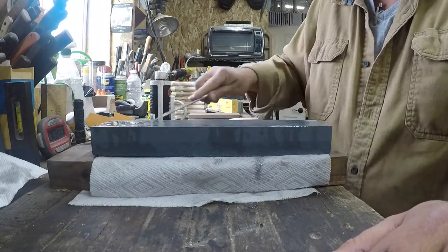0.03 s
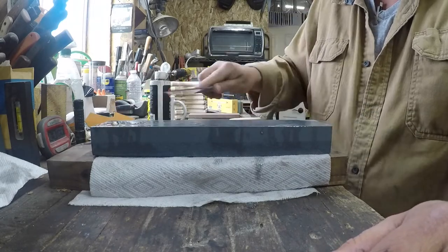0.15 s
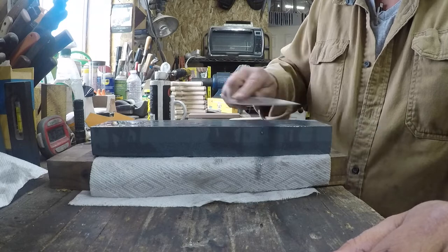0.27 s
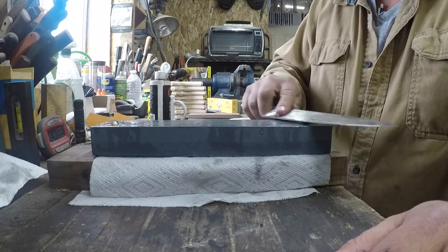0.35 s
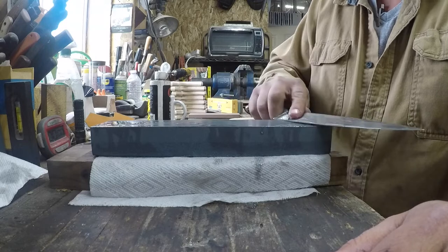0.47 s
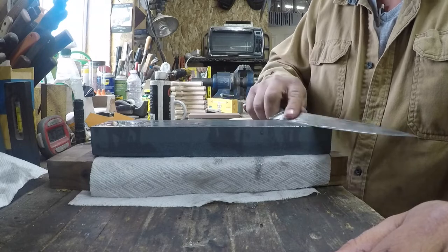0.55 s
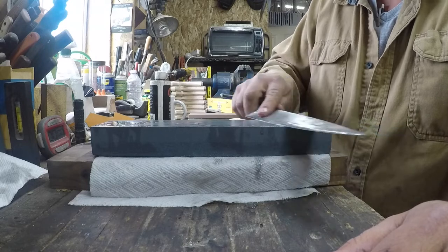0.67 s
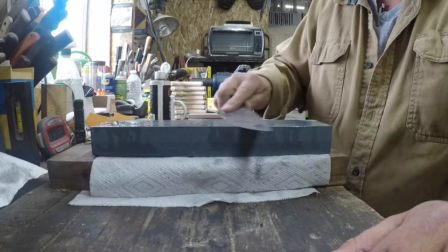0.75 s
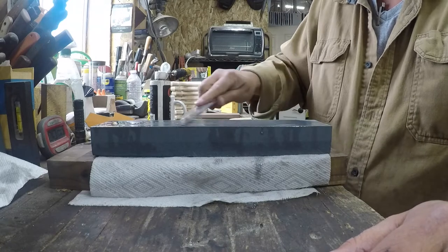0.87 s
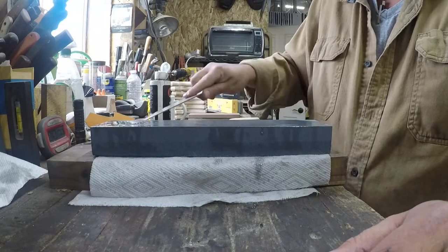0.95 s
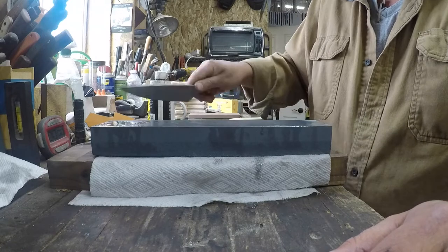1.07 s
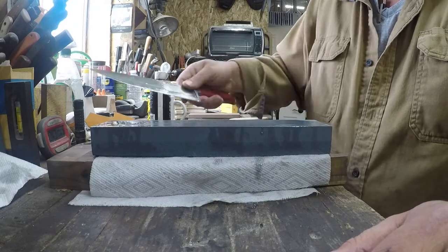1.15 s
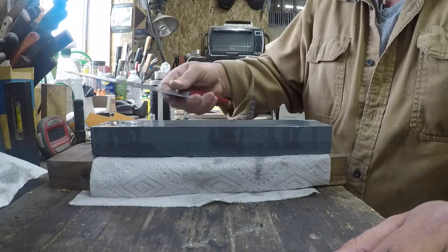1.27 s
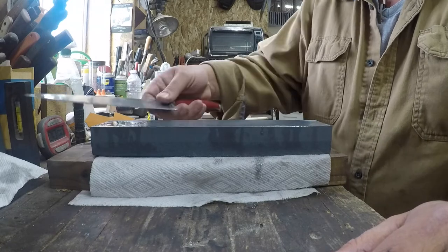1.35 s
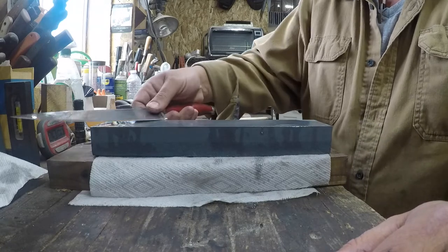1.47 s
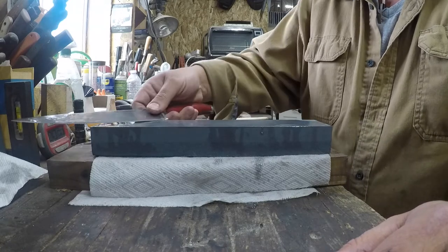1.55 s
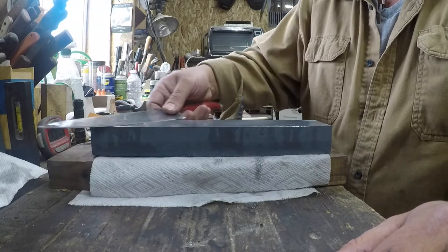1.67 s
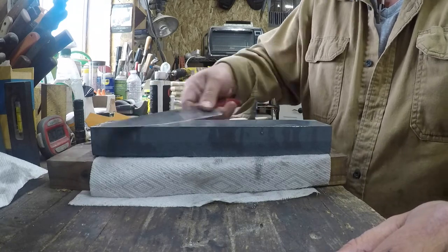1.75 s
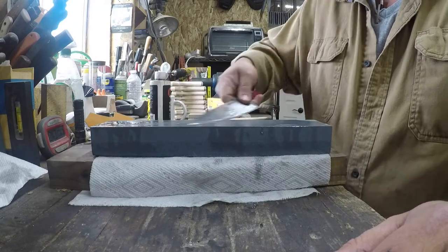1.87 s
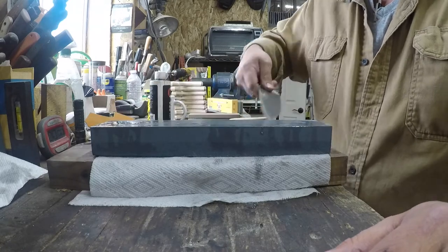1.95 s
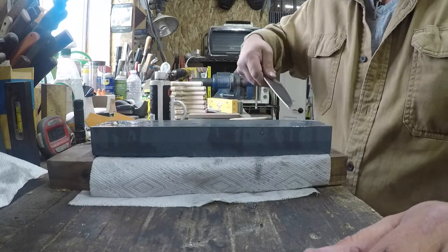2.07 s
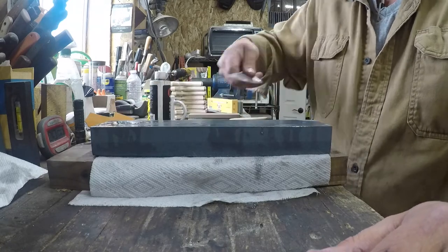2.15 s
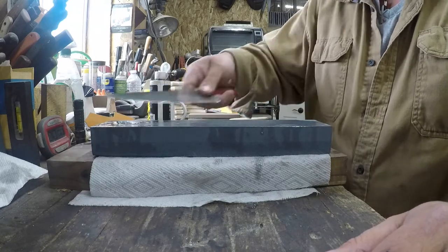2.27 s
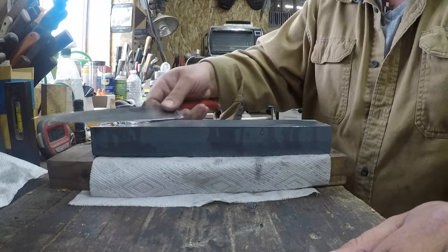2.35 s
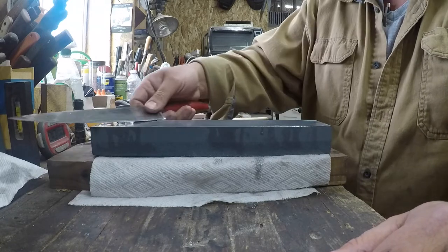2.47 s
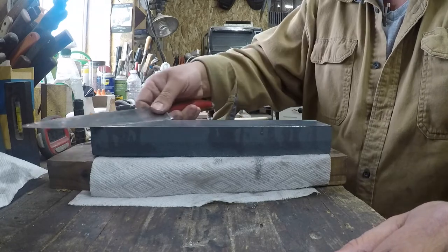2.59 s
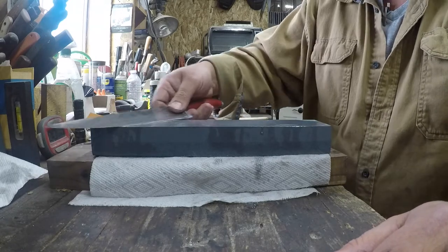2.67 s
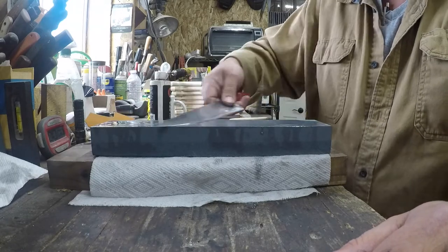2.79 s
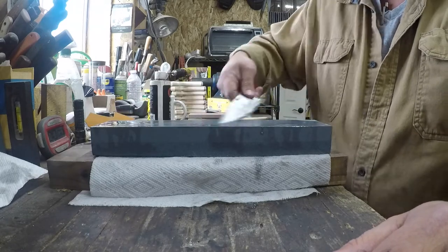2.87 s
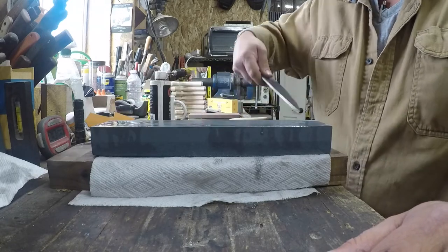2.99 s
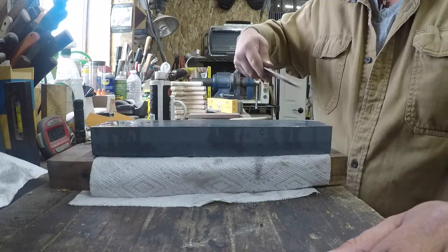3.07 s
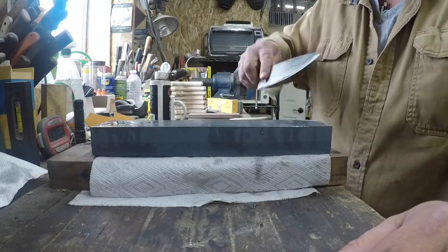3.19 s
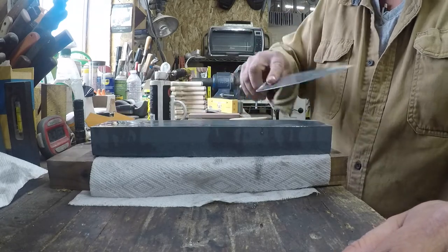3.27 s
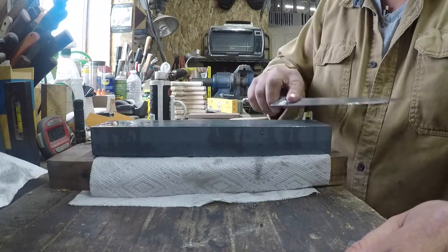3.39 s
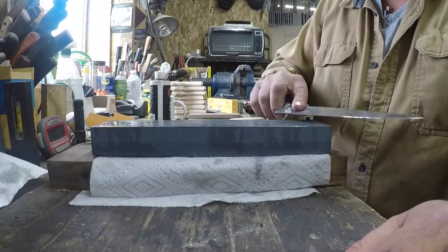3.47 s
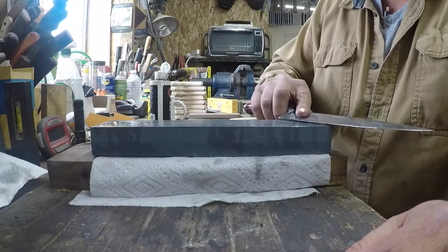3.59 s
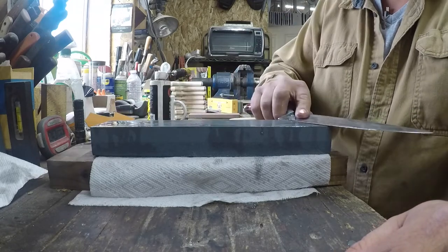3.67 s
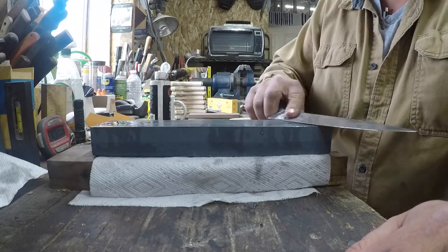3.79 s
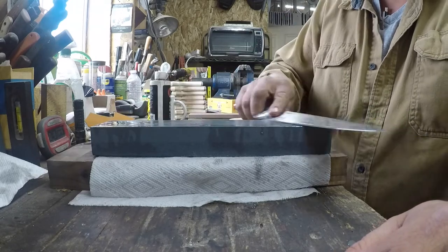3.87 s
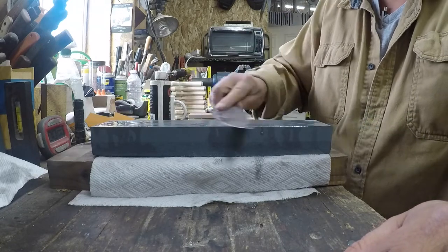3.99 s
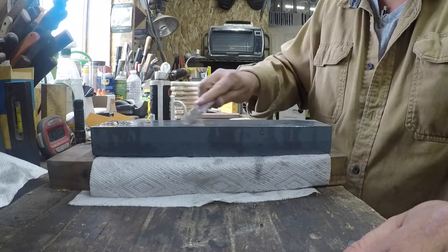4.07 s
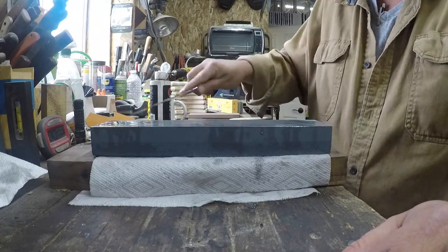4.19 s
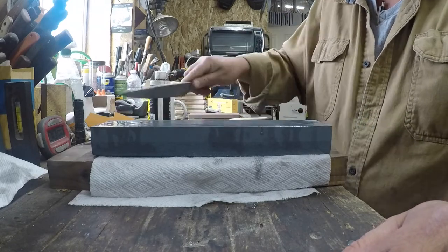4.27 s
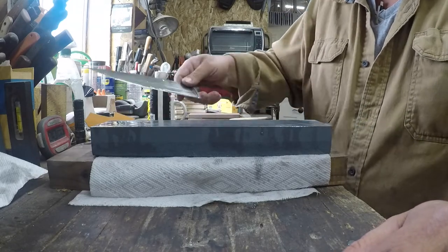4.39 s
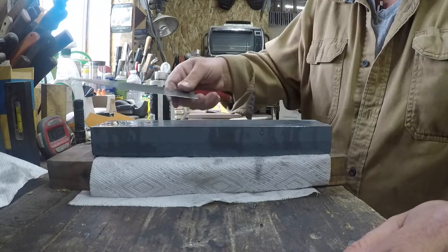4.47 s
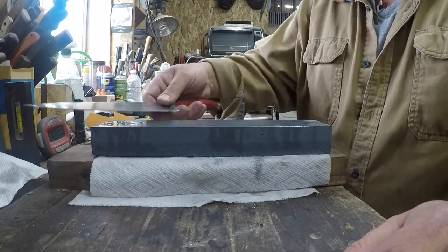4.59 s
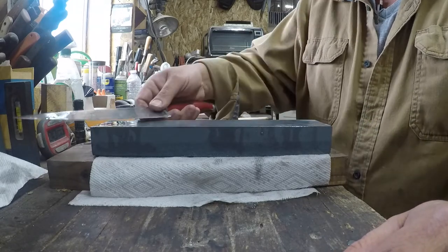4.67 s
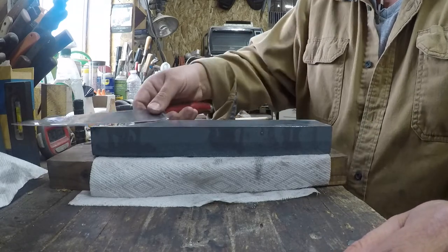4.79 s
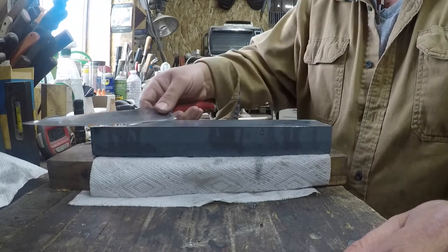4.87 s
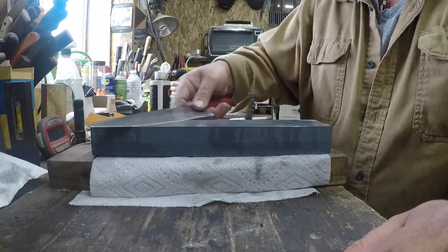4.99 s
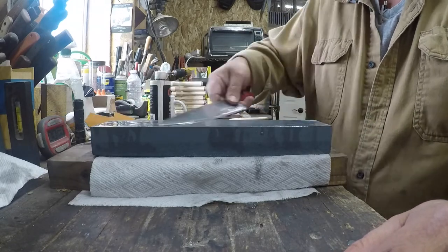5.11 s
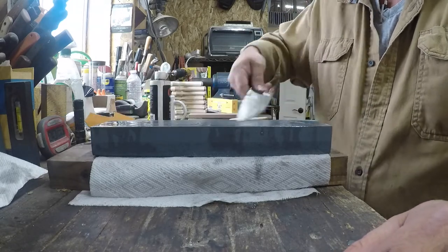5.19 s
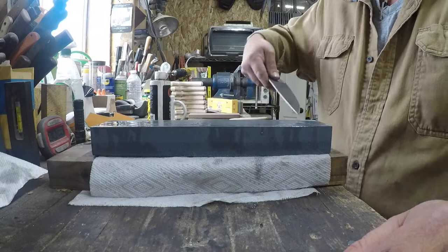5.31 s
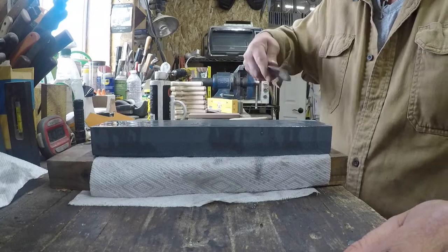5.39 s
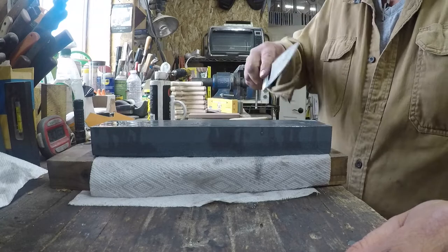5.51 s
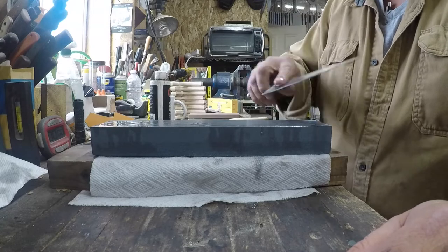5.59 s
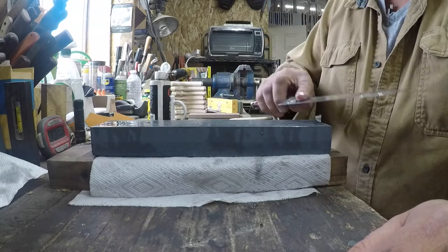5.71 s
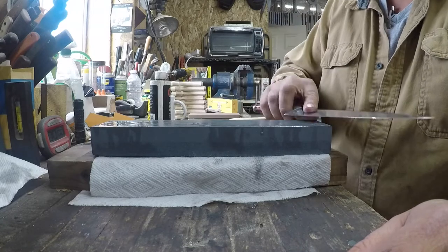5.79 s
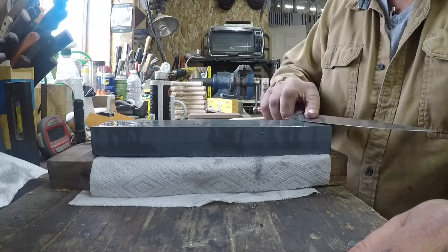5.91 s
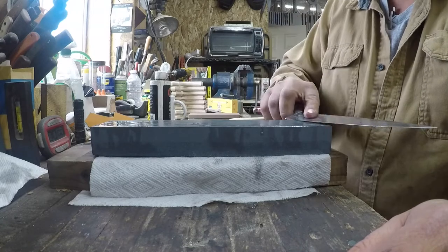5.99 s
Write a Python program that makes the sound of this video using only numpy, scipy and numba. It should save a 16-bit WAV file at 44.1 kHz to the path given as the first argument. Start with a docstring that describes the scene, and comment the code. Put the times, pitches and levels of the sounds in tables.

```python
"""Honing a long knife on a bench stone

To and fro, the blade lands, then its edge is drawn across the grit from heel to tip.
Grit noise drives steel and stone modes that glide as the contact travels; taps ring the blade's own modes.
Shaken modes make the bench thump and judder; sleeve, handle and still air are coloured noise.
The microphones stand on the same bench, in a small workshop."""
import sys
import numpy as np
from scipy import signal
from scipy.fft import rfft, irfft, next_fast_len
from scipy.io import wavfile
from scipy.ndimage import uniform_filter1d, map_coordinates
from numba import njit

SR = 44100
rng = np.random.default_rng(int(sys.argv[2]) if len(sys.argv) > 2 else 0)


def int16_out(signal):
    """Quantize to a 16-bit WAV file."""
    q = np.round(np.clip(np.atleast_2d(signal).T, -1, 1) * 32767)
    wavfile.write(sys.argv[1], SR, q.astype(np.int16))


N = 266805


def amp(db):
    """Decibels to gain."""
    return 10 ** (np.asarray(db) / 20)


def unit(x):
    """Scale to rms 1."""
    return x / np.sqrt(np.mean(x ** 2) + 1e-20)


def unit_pair(x):
    """Scale a stereo pair so that its middle has rms 1."""
    return x / np.sqrt(np.mean(x.mean(axis=0) ** 2) + 1e-20)


def clock():
    """The time of every sample in seconds."""
    return np.arange(N) / SR


def along(points, hz):
    """Interpolate (Hz, value) points on a log frequency axis."""
    point_hz, value = np.transpose(points)
    return np.interp(np.log(hz + 1), np.log(point_hz + 1), value)


def wobble(knots_per_s):
    """A smooth random curve through normally distributed knots."""
    knots = rng.standard_normal(int(N * knots_per_s / SR) + 4)
    return map_coordinates(knots, [np.arange(N) * knots_per_s / SR])


def filtered(x, response):
    """Multiply the spectrum of x by a response of frequency."""
    m = next_fast_len(N + SR // 2)
    return irfft(rfft(x, m) * response(np.fft.rfftfreq(m, 1 / SR)), m)[..., :N]


def coloured(x, spectrum):
    """Filter x by a (Hz, dB) colour and scale to rms 1."""
    return unit(filtered(x, lambda hz: amp(along(spectrum, hz))))


def noise():
    """Two unrelated white noises."""
    return rng.standard_normal((2, N))


def fade(t, t60):
    """A decay that starts at t = 0 and falls 60 dB in t60 seconds."""
    return (t >= 0) * np.exp(-np.log(1000) * np.abs(t) / t60)


def swell(s, half_s):
    """A Gaussian swell centred on s, down to 1/e at half_s either side."""
    return np.exp(-((clock() - s) / half_s) ** 2)


def add(track, s, sound):
    """Mix a short stereo sound in at time s."""
    part = track[:, max(round(s * SR), 0):][:, :sound.shape[1]]
    part += sound[:, :part.shape[1]]


def spread(pair, alike, lean):
    """Blend two unrelated signals into left and right, with a likeness and a level difference per frequency."""
    def mid_side(hz):
        turn = np.arccos(np.clip(along(alike, hz), -1, 1)) / 2
        return np.array([np.cos(turn), np.sin(turn)])

    mid, side = filtered(pair, mid_side)
    sides = np.array([mid + side, mid - side])
    return unit_pair(filtered(sides, lambda hz: amp(np.outer([.5, -.5], along(lean, hz)))))


# Likeness of the two microphones. Each row: frequency in Hz, left-right likeness from -1 to 1.
ALIKE = [(300, -1), (700, -0.15), (1200, 0.2), (2400, 0.9), (5000, 1), (6500, 0.31), (9000, -0.03),
         (14000, 0.66)]
# Balance of the two microphones. Each row: frequency in Hz, left minus right in dB.
LEAN = [(300, -14.5), (700, -4), (1200, 1.5), (4000, -0.5), (7000, -1.5), (9500, -6), (13000, 1.5)]


def at_microphones(pair):
    """Knife and stone sounds as they differ between the two microphones."""
    return spread(pair, ALIKE, LEAN)


def patchy(x, depth_db):
    """The contact shifts from moment to moment, favouring narrow bands at random."""
    z = signal.stft(x, nperseg=1024)[2]
    field = rng.standard_normal(z.shape[1:])
    field = uniform_filter1d(field, size=6, axis=0)
    field = uniform_filter1d(field, size=4, axis=1)
    gain = amp(depth_db * np.clip(unit(field), -2, 2))
    return unit(signal.istft(z * gain, nperseg=1024)[1][:, :N])


@njit
def resonate(x, pole):
    """A resonance whose pitch may change at every sample."""
    out = np.zeros(x.shape)
    for c in range(x.shape[0]):
        state = 0j
        for i in range(x.shape[1]):
            state = state * pole[i] + x[c, i]
            out[c, i] = state.real
    return out


# The edge digs in and drags differently. Each row: centre in seconds, half length in seconds, then the
# change of edge hiss, blade body, stone grind and bench shake, each in dB.
DIGS = [(0.556, 0.028, -1, 4.5, 2, 8), (0.665, 0.08, 4.5, 1.5, 0, -8), (1.63, 0.02, -2.5, 1, -7, 2.5),
        (1.725, 0.066, 2, 3.5, -1.5, 1), (1.96, 0.033, 1, 6, 1.5, -0.5), (2.587, 0.017, 5, 9, 11, 3),
        (2.651, .016, -0.5, 7, 5, 6), (2.704, 0.014, 2, 3, 4, 2), (2.798, 0.038, 3, 4, -3, 2),
        (3.72, 0.026, 4, 9.5, 8.5, -6), (3.892, 0.031, 7, 7.5, -4, 1.5), (3.956, 0.042, 4.5, 8.5, 2, -3),
        (4.012, .018, -1.5, 10.5, 14, 6.5), (4.109, 0.03, 0.5, 9, 2, -5.5),
        (5.083, 0.03, -2.5, -1.5, 4, 5.5)]


def digs():
    """Where the edge digs in, layer levels shift for a moment (dB); judder and rocking share the bench's."""
    swells = np.array([np.exp(-np.minimum(((clock() - s) / half_s) ** 2, 20)) for s, half_s, *_ in DIGS])
    hiss, body, grind, bench = np.transpose(DIGS)[2:] @ swells
    return np.array([hiss, body, grind, bench, bench])


# The edge is drawn from heel to tip. Each row: start in seconds, lift in seconds, bite time constant in
# seconds, then relative levels in dB of edge hiss, blade body, stone grind, bench judder, stone rocking.
STROKES = [(-0.45, 0.019, 0.09, -25.5, -33, -49, -33, -45),
           (0.493, 0.927, 0.034, -25, -34, -45.5, -37, -41.5),
           (1.526, 1.978, 0.074, -26, -33.5, -42, -33.5, -38),
           (2.53, 2.927, 0.039, -27.5, -34, -44, -35, -37.5),
           (3.678, 4.126, 0.074, -25, -38.5, -48.5, -38, -41),
           (4.748, 5.235, 0.094, -27, -34.5, -45.5, -38, -39),
           (5.957, 6.403, 0.23, -28, -41, -48, -39.5, -38.5)]
# How each layer, in that order, follows a stroke. Each row: dB lacking before the edge bites,
# dB lost at the light tip, unevenness in dB.
LAYERS = [(29.9, 4, 0.2), (24.4, 7.5, 1.43), (3, 15, 2.5), (5, 6, 3), (4.9, 12.5, 3)]
DRAW_S = .46  # heel to tip at steady hand speed; a shorter stroke starts further along the edge
TIP_POWER = 3.7  # the drag falls off late in the stroke
UNEVEN_PER_S = 30
TOUCH_T60_S, RELEASE_T60_S = 0.078, 0.1


def hand():
    """Strokes bite, lighten and lift: five layer gains, and the contact's travel from heel (0) to tip (1)."""
    t, gains, travel = clock(), np.zeros((len(LAYERS), N)), np.zeros(N)
    lacking_db, tip_db, uneven_db = np.transpose(LAYERS)[:, :, None]
    for start, lift, bite_s, *levels_db in STROKES:
        near = (t > start - .1) & (t < lift + .3)
        age = t[near] - start
        after = np.maximum(t[near] - lift, 0)
        travel[near] = np.clip(1 - (lift - t[near]) / DRAW_S, 0, 1)
        contact = fade(np.maximum(-age, 0), TOUCH_T60_S) * fade(after, RELEASE_T60_S)
        bite_db = -lacking_db * np.exp(-np.maximum(age, 0) / bite_s)
        lighten_db = -tip_db * travel[near] ** TIP_POWER
        gains[:, near] += contact * amp(np.array(levels_db)[:, None] + bite_db + lighten_db)
    drag_db = uneven_db * np.array([wobble(UNEVEN_PER_S) for _ in LAYERS])
    return gains * amp(drag_db + digs()), travel


def grit(catch, grains_per_s, size_db, bed):
    """Single grains snap under the edge, over a bed of finer ones."""
    sizes = amp(size_db * np.minimum(rng.exponential(size=N), 1.6))
    snaps = (rng.random(N) < grains_per_s / SR) * sizes
    return catch * (unit(snaps * np.sign(noise())) + bed * noise())


def rubbed(force, spectrum, glides, travel):
    """Friction excites modes that slide with the contact, under a broad fixed colour."""
    out = force
    for heel_hz, tip_hz, width_hz, db in glides:
        hz = heel_hz * (tip_hz / heel_hz) ** travel * (1 + 0.012 * wobble(11))
        pole = np.exp(np.pi * (2j * hz - width_hz) / SR)
        out = out + amp(db) * 2 * np.pi * width_hz / SR * resonate(force, pole)
    return coloured(out, spectrum)


# Bending modes of the blade. Each row: frequency in Hz, relative level in dB,
# t60 in seconds before the cap and the contact's damping.
STEEL = [(2500, -8, 0.29), (3306, -3.5, 0.15), (3440, -13, 0.091), (4340, -10, 0.31), (4980, -9, 0.18),
         (5230, -11, 0.27), (5990, 7, 0.13), (6280, 10, 0.11), (6800, 0.5, 0.13), (7245, 8, 0.16),
         (7470, 1, 0.18), (7930, -2, 0.29), (8630, -5.5, 0.28), (8930, -7, 0.17), (10100, -12, 0.29)]


def blade_ring(damping, scatter_db):
    """The blade's answer to one tap, of energy 1 in the middle; every tap weighs the modes anew."""
    t = np.arange(SR // 2) / SR
    ring = 0
    for hz, db, t60 in STEEL:
        size = amp(db + scatter_db * rng.standard_normal((2, 1)))
        apart = np.arccos(np.clip(along(ALIKE, hz), -1, 1))  # phase between the microphones
        phase = 2 * np.pi * rng.random() + np.array([[.5], [-.5]]) * apart
        ring = ring + size * np.sin(2 * np.pi * hz * t + phase) * fade(t, min(t60, .25) / damping)
    return ring / np.linalg.norm(ring.mean(axis=0))


# Broad colours of edge hiss, blade body and stone grind. Each row: frequency in Hz, relative dB per Hz.
HISS = [(2590, -40), (4400, -30.5), (5250, -3.5), (5580, -7), (6120, 1), (7260, 3), (7690, 0), (8310, -5),
        (10300, -8), (11200, -15), (12400, -10), (15100, -27.5)]
BODY = [(880, -22), (1500, -16), (2300, -8), (2690, -6), (3320, -1.5), (3610, -0.5), (4050, -1.5),
        (4700, 0.5), (6110, -13), (10300, -120)]
GRIND = [(250, -17), (400, 3.5), (620, -6), (750, 5), (950, -.5), (1150, -1), (1400, -9), (1800, 1),
         (2600, -47)]
# Modes that move with the contact, for hiss, body and grind. Each row: frequency at the heel in Hz,
# frequency at the tip in Hz, width in Hz, gain in dB against the direct force, before the broad colour.
HIGH_GLIDES = [(5730, 9500, 39, 2.6), (7000, 7600, 89, 1.7), (6500, 2060, 31, 1.8), (8100, 10000, 45, 4.6)]
MID_GLIDES = [(2254, 3950, 15, 8), (3503, 3800, 18, 7.2), (2540, 1960, 29, 1.5), (1327, 2500, 10.5, 8.3)]
LOW_GLIDES = [(520, 1750, 64, 21), (431, 998, 95, 17), (1170, 1160, 38, 9.5)]


def scrape(gains, travel):
    """The edge catches and slips over the grit, hissing in the steel and grinding in the stone."""
    catch = amp(1.3 * np.tanh(wobble(70)) + 2.5 * np.tanh(wobble(330)))
    hiss = rubbed(grit(catch, grains_per_s=3200, size_db=1.5, bed=1.37), HISS, HIGH_GLIDES, travel)
    body = rubbed(grit(catch, grains_per_s=800, size_db=-0.5, bed=1.0), BODY, MID_GLIDES, travel)
    grind = rubbed(grit(catch, grains_per_s=310, size_db=8.0, bed=0.85), GRIND, LOW_GLIDES, travel)
    edge = gains[0] * at_microphones(patchy(hiss, depth_db=4.4))
    edge += gains[1] * at_microphones(patchy(body, depth_db=4.4))
    stone = gains[2] * at_microphones(patchy(grind, depth_db=3))
    # near the heel the long blade is freer to ring on its own modes
    free = 0.27 * np.exp(-(travel / 0.44) ** 2)
    drive = np.sqrt(free) * gains[0] * catch * rng.standard_normal(N)
    steel = blade_ring(damping=2.6, scatter_db=1)
    singing = signal.fftconvolve(drive[None], steel, axes=1)[:, :N]
    return amp(-1.5) * np.sqrt(1 - free) * edge + singing + amp(-2.5) * stone


def bench_sides(left_db):
    """The shaken microphones hear the bench in opposite phase on their two sides."""
    return np.array([[-amp(left_db)], [1]])


def judder(gain, spectrum, left_db, t60):
    """Uneven drag keeps a low mode shaking, and the wood rings on after the edge has left."""
    shake = coloured(rng.standard_normal(N), spectrum)
    envelope = np.sqrt(np.abs(uniform_filter1d(shake ** 2, size=1400)) + 1e-9)
    # the gain may fall no faster than t60
    ringing = np.log(1000) * clock() / t60
    held = np.exp(np.maximum.accumulate(np.log(gain + 1e-9) + ringing) - ringing)
    return held * unit_pair(bench_sides(left_db) * shake / envelope)


# Colours of bench judder and stone rocking. Each row: frequency in Hz, relative dB per Hz.
JUDDER = [(110, -68), (145, -20.5), (165, -8), (182, -3), (191, 10.5), (203, -4.5), (220, -18),
          (270, -56.5)]
ROCKING = [(210, -17.5), (275, -2.5), (305, 8), (328, 9), (360, -3), (420, -20), (520, -21.5), (700, -58)]


def bench_shake(gains):
    """The drag judders the bench and rocks the stone."""
    bench = judder(gains[3], JUDDER, left_db=-13.0, t60=0.32)
    return bench + judder(gains[4], ROCKING, left_db=-7.5, t60=0.047)


# Colour of the still air. Each row: frequency in Hz, relative dB per Hz.
AIR = [(30, -4), (100, -10.5), (190, 1.5), (320, -3.5), (450, -7.5), (750, -7), (1100, -11), (2600, -22.5),
       (4600, -29), (7000, -25), (10000, -28), (15000, -40.5)]
# Likeness of the air at the microphones. Each row: frequency in Hz, left-right likeness from -1 to 1.
AIR_ALIKE = [(150, 0.062), (400, -0.34), (700, -0.89), (1400, -0.72), (2400, -0.19), (3800, 0.53),
             (6000, 0.14)]


def still_air():
    """Steady coloured noise, wide between the microphones."""
    lean = [(1000, -0.26), (9000, -1.7)]  # Hz, left minus right in dB
    return amp(-53.5) * spread(coloured(noise(), AIR), AIR_ALIKE, lean)


# Decay of the room. Each row: frequency in Hz, t60 in seconds.
WORKSHOP = [(200, 0.72), (1000, 0.7), (4000, 0.45), (8000, 0.45), (14000, 0.3)]


def workshop(x):
    """The cluttered room answers after 5 ms, each frequency dying at its own speed."""
    hz, t, z = signal.stft(rng.standard_normal((2, SR // 2)), SR, nperseg=256)
    tail = signal.istft(z * fade(t, along(WORKSHOP, hz)[:, None]), SR, nperseg=256)[1]
    delayed = np.pad(tail, ((0, 0), (SR // 200, 0)))
    return signal.fftconvolve(x, delayed / np.linalg.norm(tail[0]), axes=1)[:, :N]


# Low modes of bench and stone. Each row: frequency in Hz, t60 in seconds, relative level in dB,
# left microphone against the right in dB.
BENCH = [(186.75, 0.36, 2, -17.5), (154, 0.063, -7, 0), (309.3, 0.12, -2.5, -4), (361, 0.043, -8, -31)]


def thump(rise_s):
    """One blow on the bench: the heavy stone, on its towel, passes it on gradually."""
    t = np.arange(SR // 2) / SR
    modes = 0
    for hz, t60, db, left_db in BENCH:
        tone = np.sin(2 * np.pi * hz * (t - rise_s)) * fade(t, t60)
        modes = modes + amp(db) * bench_sides(left_db) * tone
    return modes * (1 - np.exp(-(t / rise_s) ** 2))


# The blade lands on the stone. Each row: time in seconds, then levels in dB before trim of contact
# scratch, steel ring, thump and knock, then chatter t60 in seconds.
LANDINGS = [(0.364, -52, -34, -25, -38, 0.32), (1.451, -22, -48.5, -30, -38.5, 0.17),
            (2.3621, -59, -34.5, -27.5, -37.5, 0.33), (3.6128, -13, -42, -34, -36.5, 0.21),
            (4.7041, -14.5, -50.5, -32, -46.5, 0.11), (5.8627, -15, -48.5, -31.5, -44, 0.23)]
# Colours of scratch and stone knock. Each row: frequency in Hz, relative dB per Hz.
SCRATCH = [(800, -4), (2500, -13), (4500, 0), (7000, -9), (10000, -4.5), (15000, -17)]
KNOCK = [(110, -38), (200, 9), (330, -5), (430, 2), (560, 3), (760, 2.5), (1000, -27), (1800, -22.5),
         (3000, -32.5), (6000, -68)]


def landings():
    """The edge taps the stone and chatters briefly; the stone knocks and the bench thumps."""
    out, t = np.zeros((2, N)), np.arange(SR // 2) / SR
    scratches, knocks = np.zeros(N), np.zeros(N)
    for s, scratch_db, ring_db, thump_db, knock_db, chatter_t60 in LANDINGS:
        since = clock() - s
        settle = np.clip(since / 0.0011, 0, 1)
        chatter = rng.standard_normal(len(t)) * (fade(t, chatter_t60) + fade(t, 0.0012))
        steel = blade_ring(damping=2.2, scatter_db=1.5)
        ring = signal.fftconvolve(chatter[None], steel, axes=1)[:, :len(t)]
        # level set by the first 33 ms
        add(out, s, amp(ring_db - 1) * ring / np.std(ring[:, :SR // 30]))
        scratches += amp(ring_db - 5) * settle * fade(since, chatter_t60)
        scratches += amp(scratch_db - 25) * fade(since, 0.028)
        add(out, s, amp(thump_db + 14.0) * thump(rise_s=.0065))
        knocks += amp(knock_db + 8.5) * settle * fade(since, 0.083)
    scratch = at_microphones(patchy(coloured(noise(), SCRATCH), depth_db=11.5))
    return out + scratches * scratch + knocks * at_microphones(coloured(noise(), KNOCK))


# The edge grips and squeaks. Each row: centre in seconds, half length in seconds, frequency in Hz,
# level in dB before trim.
SQUEAKS = [(0.653, 0.043, 3530, -32), (0.731, .006, 6100, -23.5), (1.972, 0.011, 6100, -27),
           (2.649, 0.0063, 2080, -32.5), (2.771, 0.011, 1170, -41.5), (2.927, 0.012, 7150, -30.5),
           (3.803, 0.014, 2640, -49), (3.962, 0.016, 3750, -28.5), (4.102, 0.014, 2400, -41),
           (5.085, 0.032, 1170, -44)]


def squeaks():
    """For a moment the slipping edge locks on to one mode of the steel."""
    t, out = clock(), 0
    for s, half_s, hz, db in SQUEAKS:
        tone = np.sin(2 * np.pi * hz * t + 1.08 * wobble(150))
        out = out + amp(db) * swell(s, half_s) * tone
    return out * amp(2.5 + 1.6 * np.tanh(wobble(240)))


# Soft nudges of the bench. Each row: time in seconds, level in dB before trim.
NUDGES = [(1.19, -48), (4.254, -50), (5.639, -57)]
# Faint swishes as the knife is turned over. Each row: centre in seconds, half length in seconds, level in dB.
SWISHES = [(1.23, .018, -60), (5.655, .049, -60.5)]
# The sleeve brushes as the arm turns. Each row: centre in seconds, half length in seconds,
# level in dB before unevenness.
BRUSHES = [(1.308, 0.028, -56.5), (4.382, 0.11, -57), (4.625, 0.13, -55.5), (5.455, 0.064, -72),
           (5.653, 0.045, -68)]
# Light ticks of the handle turning in the hand. Each row: time in seconds, level in dB before trim.
TICKS = [(4.376, -30.5), (4.627, -45), (5.422, -42)]
# Colours of sleeve and handle. Each row: frequency in Hz, relative dB per Hz.
CLOTH = [(100, -36), (170, -1), (400, 12), (1200, -0.5), (3000, -15.5), (8000, -15), (15000, -59)]
HANDLE = [(150, -15), (500, 14), (1400, 6), (3000, -11), (8000, -12), (15000, -30)]


def handling():
    """Bursts of coloured noise for sleeve, handle and turning knife, and soft thumps of the nudged bench."""
    t = clock()
    brush = sum(amp(db) * swell(s, half_s) for s, half_s, db in BRUSHES) * amp(2.0 * wobble(77))
    ticks = sum(amp(db - 15) * fade(t - s, 0.085) for s, db in TICKS)
    swish = sum(amp(db) * swell(s, half_s) for s, half_s, db in SWISHES)
    out = brush * at_microphones(coloured(noise(), CLOTH))
    out += ticks * at_microphones(coloured(noise(), HANDLE))
    out += swish * at_microphones(coloured(noise(), HISS))
    for s, db in NUDGES:
        add(out, s, amp(db + 3.0) * thump(rise_s=0.0033))
    return out


# The tip slips off and the blade sings on. Each row: time in seconds, level in dB, t60 in seconds.
LIFTS = [(2.935, -42, 0.22), (5.233, -49, 0.38)]
FREE_HZ = 3330  # the free blade's clearest mode


def lifts():
    """Released from the stone, the blade rings briefly on one decaying mode."""
    t = clock()
    return sum(amp(db) * np.sin(2 * np.pi * FREE_HZ * (t - s)) * fade(t - s, t60) for s, db, t60 in LIFTS)


def scene():
    """Knife and stone in the room, the bench under them, and the still air of the shop."""
    gains, travel = hand()
    near = scrape(gains, travel) + squeaks() + lifts() + handling()
    blows = landings()
    room = workshop(amp(-11) * near + amp(-10) * blows)
    return near + blows + bench_shake(gains) + room + still_air()


OVERLOAD = .5  # ceiling of the rounded peaks, full scale 1
TOP_HZ = 15280


def record(dry):
    """Cut the deep bass steeply but for a trace, round off the highest peaks, keep nothing above TOP_HZ."""
    thin = signal.sosfilt(signal.butter(8, 130, "highpass", fs=SR, output="sos"), dry)
    x = thin + amp(-16.0) * dry
    rounded = x / (1 + np.abs(x / OVERLOAD) ** 6) ** (1 / 6)
    return filtered(rounded, lambda hz: hz < TOP_HZ)


dry = scene()
out = record(dry)
int16_out(out)
```